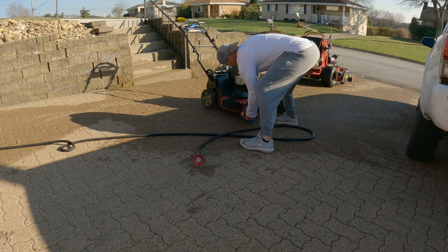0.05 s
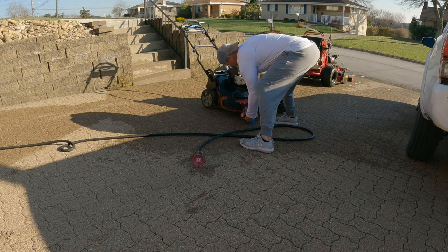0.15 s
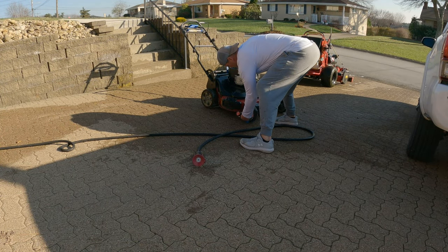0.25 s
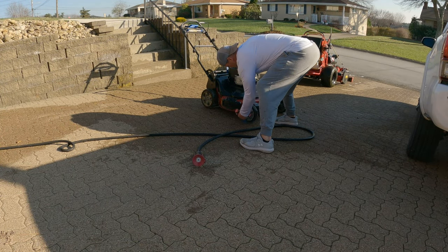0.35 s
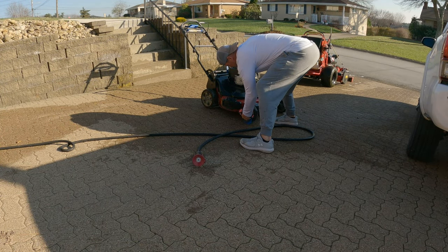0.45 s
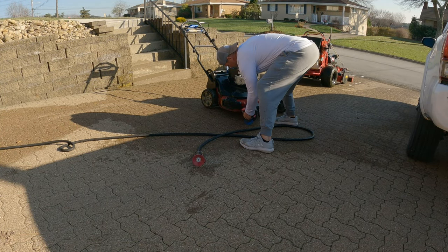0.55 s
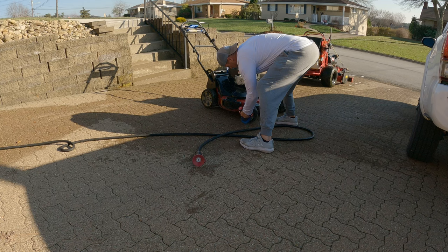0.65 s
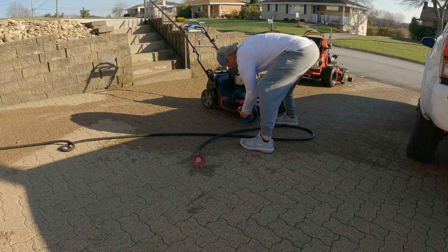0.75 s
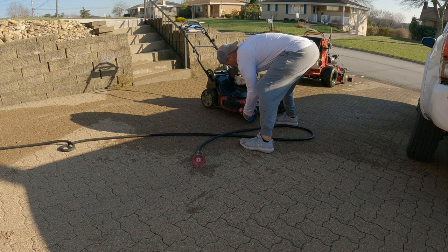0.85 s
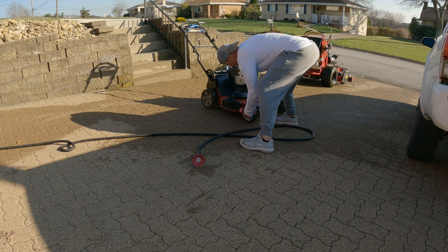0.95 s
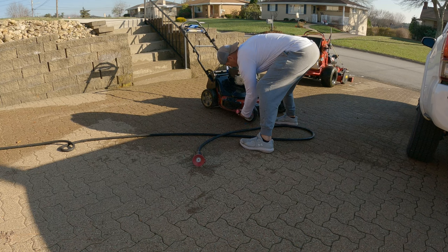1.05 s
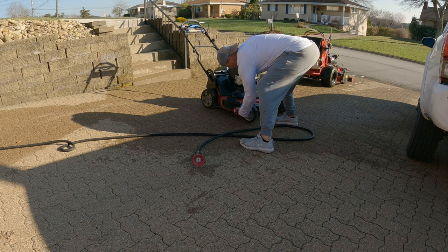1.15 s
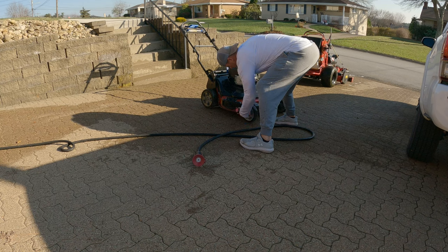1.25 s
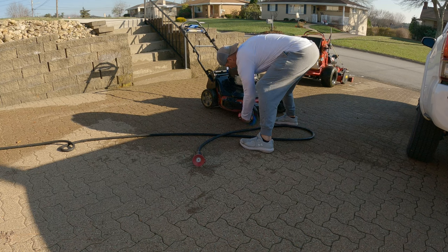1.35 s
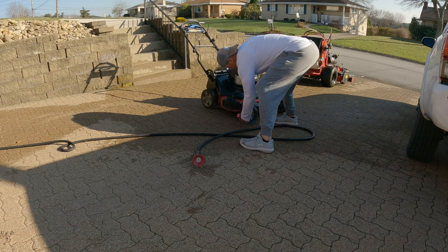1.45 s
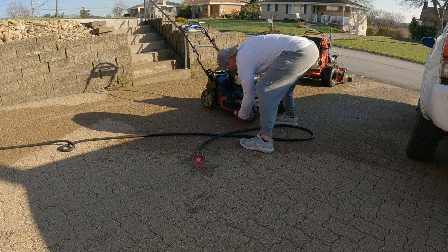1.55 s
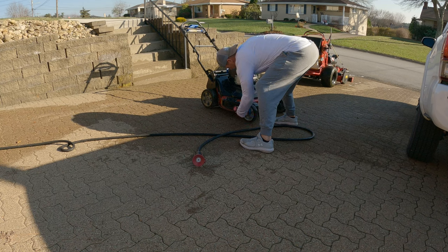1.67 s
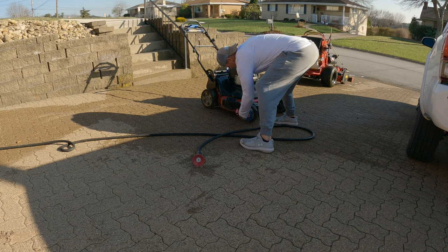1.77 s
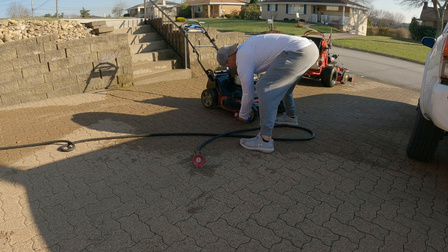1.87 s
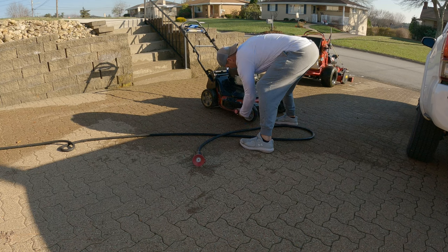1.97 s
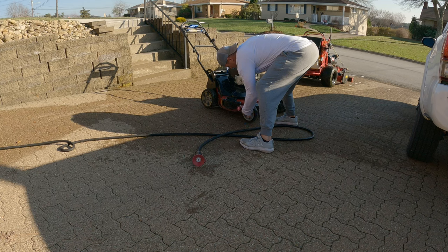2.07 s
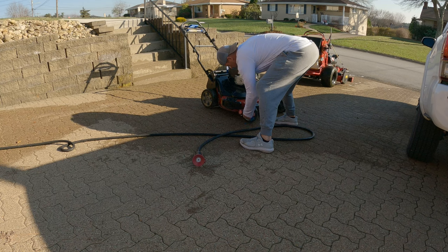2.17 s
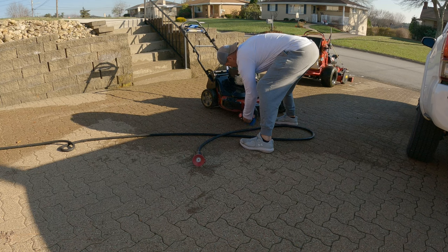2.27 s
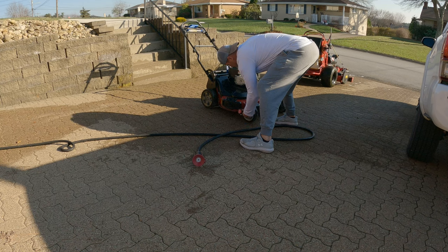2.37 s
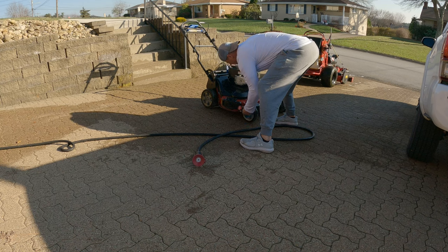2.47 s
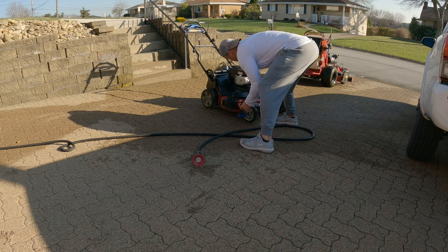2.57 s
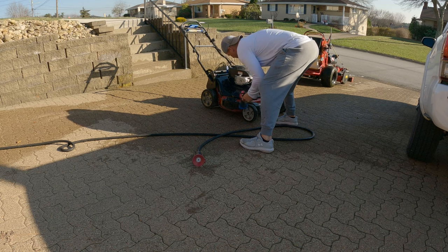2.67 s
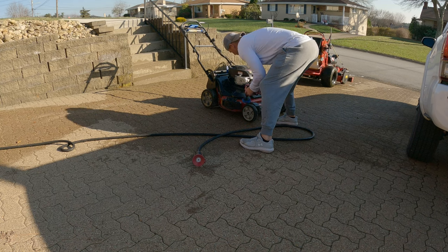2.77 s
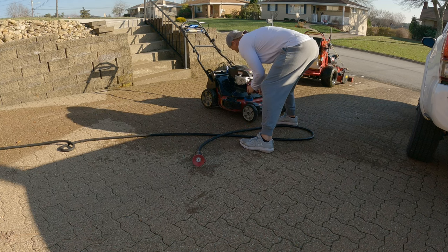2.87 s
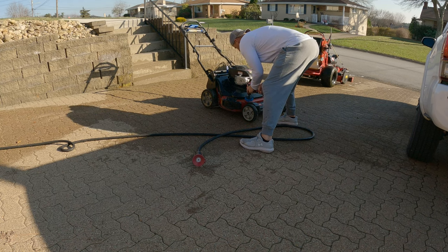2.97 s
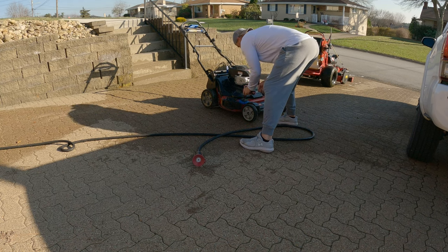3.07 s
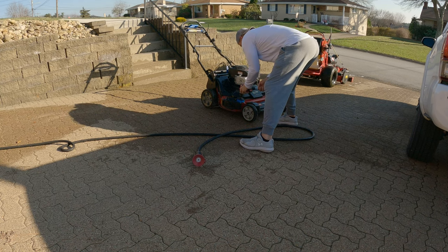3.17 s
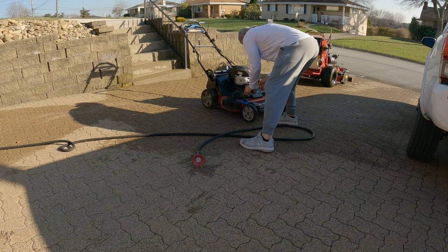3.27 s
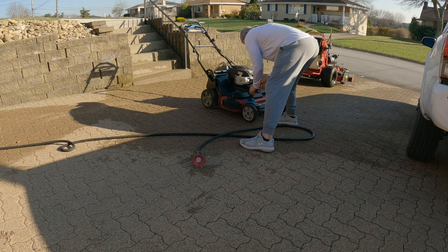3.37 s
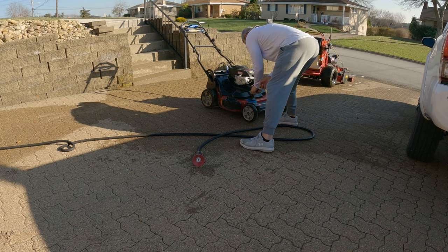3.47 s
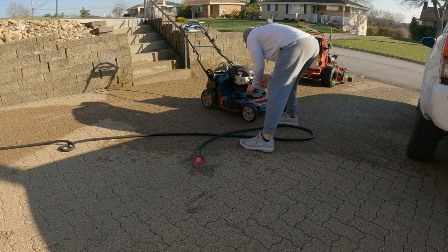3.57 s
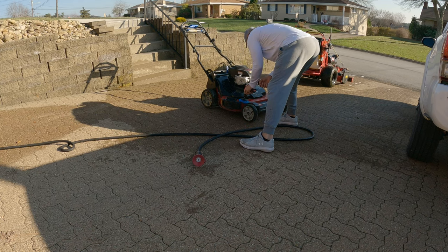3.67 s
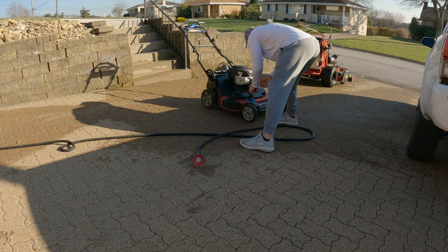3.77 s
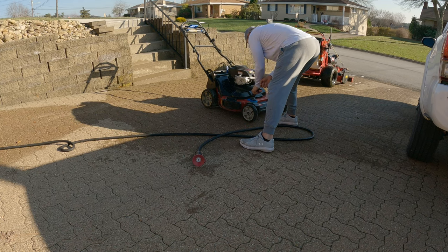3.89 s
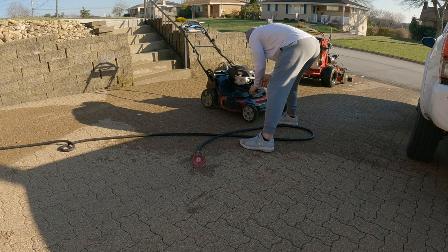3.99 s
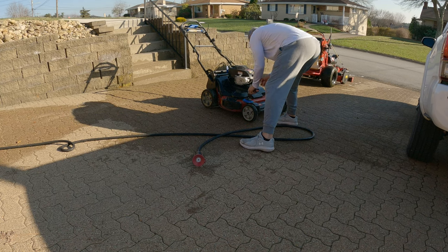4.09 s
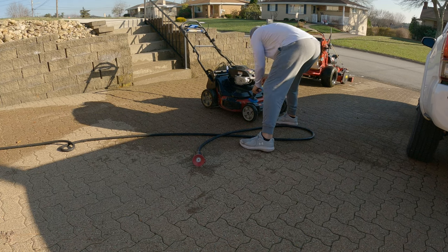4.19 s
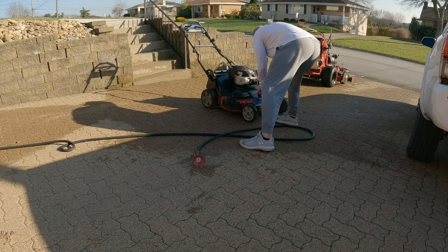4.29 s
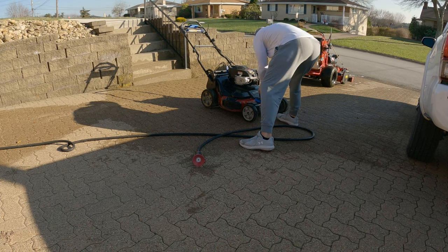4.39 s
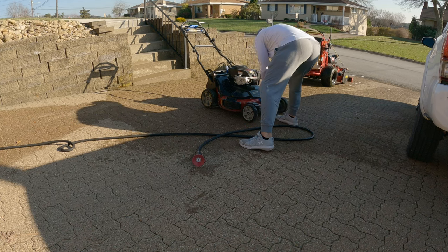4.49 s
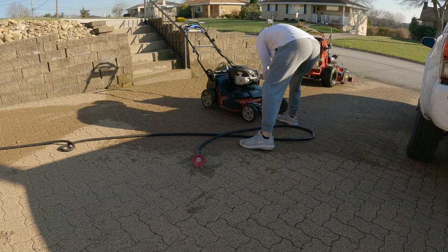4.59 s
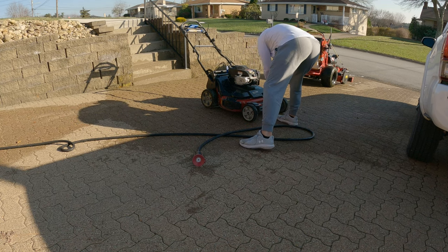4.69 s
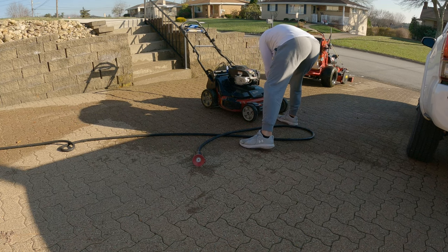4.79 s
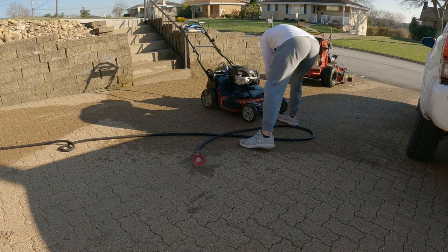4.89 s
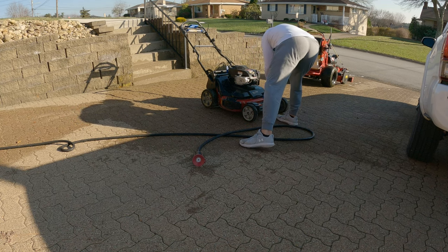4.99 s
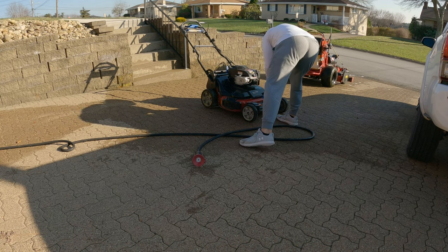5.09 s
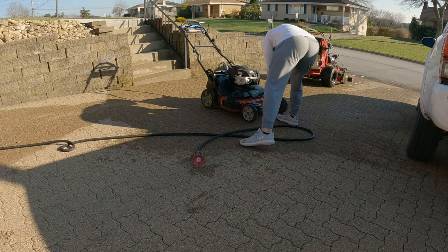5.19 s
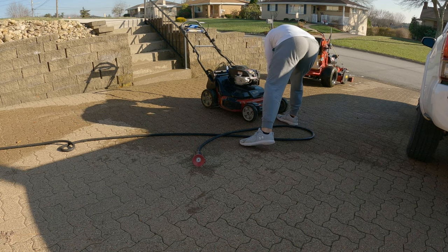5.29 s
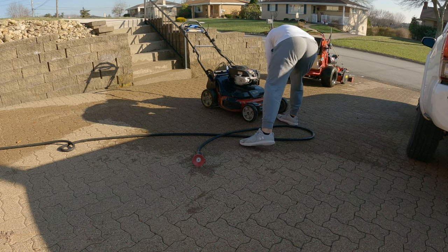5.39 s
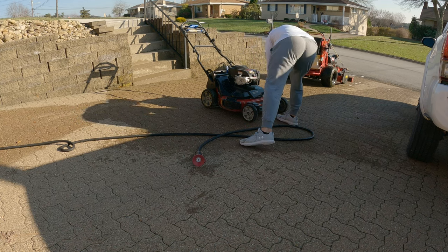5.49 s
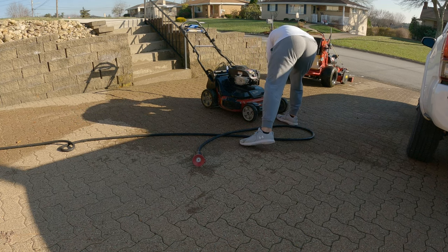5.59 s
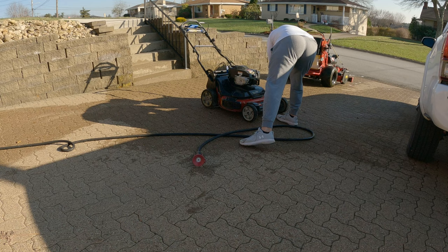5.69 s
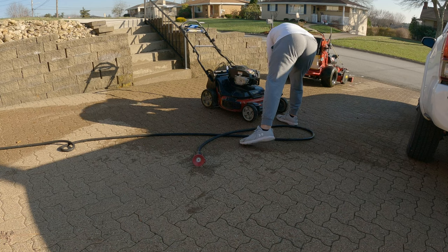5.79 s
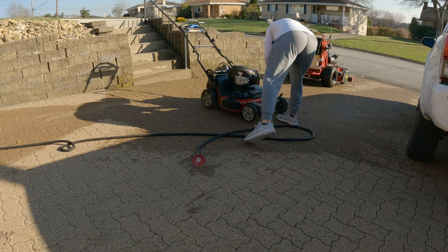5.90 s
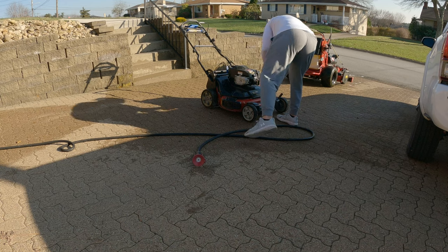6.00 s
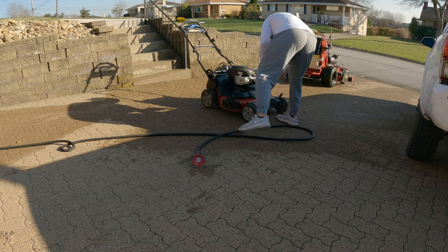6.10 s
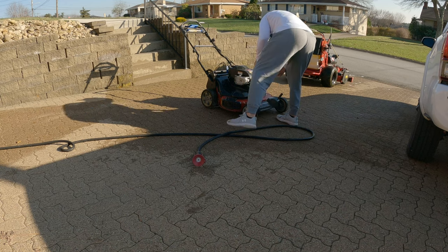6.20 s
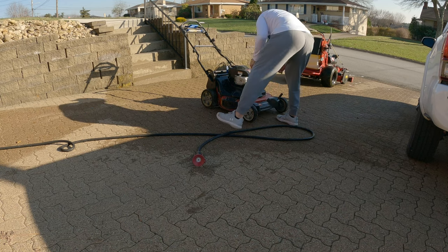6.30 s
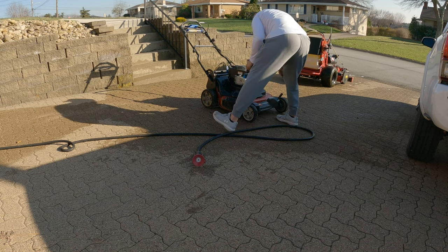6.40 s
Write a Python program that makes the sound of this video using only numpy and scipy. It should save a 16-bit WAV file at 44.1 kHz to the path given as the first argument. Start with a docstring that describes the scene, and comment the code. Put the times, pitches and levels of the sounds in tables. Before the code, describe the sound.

On a paved yard, a cordless drill spins a scrub brush on a mower: bright motor whine, gear rattle and bristle hiss, with a few light plastic taps. It drops to a stop, restarts quieter with changing pitch and dull steel knocks, then winds down. Low wind buffets the nearby microphone, and shoes scuff faintly at the end.

```python
"""A paved yard, where a cordless drill spins a scrub brush on a mower in two bursts.
Motor and gear teeth whine as sines at multiples of the shaft speed; rattle and bristle hiss are banded noise.
The brush hub taps the plastic wheel and the drill bumps the steel deck: clicks that ring their modes.
A deck panel hums as one wavering sine, walls answer through feedback delays,
shoes scuff in gritty bursts, and wind buffets the microphone over faint far air."""
import sys
import numpy as np
from scipy import signal
from scipy.fft import rfft, irfft
from scipy.io import wavfile
from scipy.ndimage import uniform_filter1d

SR = 44100
rng = np.random.default_rng(int(sys.argv[2]) if len(sys.argv) > 2 else 0)


def store_wav(level_fs):
    """Save 16-bit WAV to argv[1]."""
    pcm = np.round(np.clip(np.atleast_2d(level_fs), -1, 1) * 32767)
    wavfile.write(sys.argv[1], SR, pcm.T.astype(np.int16))


N = 284434


def amp(db):
    """dB to gain."""
    return 10 ** (np.asarray(db) / 20)


def rms_one(x):
    """Scale to rms 1."""
    return x / np.sqrt(np.mean(x ** 2) + 1e-20)


def in_time(rows):
    """Draw the columns after the time column as sample-by-sample curves."""
    s, *columns = np.transpose(rows)
    return [np.interp(np.arange(N) / SR, s, c) for c in columns]


def while_on(tables, rise_s=0.0097, fall_s=0.0081):
    """Gate that is open from the first to the last time of each table; one that starts at 0 is open at once."""
    t = np.arange(N) / SR
    gate = 0
    for rows in tables:
        start, end = rows[0][0], rows[-1][0]
        fade_in = (t - start) / rise_s + (start == 0)
        fade_out = (end - t) / fall_s
        gate = gate + np.clip(np.minimum(fade_in, fade_out), 0, 1)
    return gate


def at_hz(points, hz):
    """Read a spectrum on a log-frequency axis."""
    points = np.array(points)
    return np.interp(np.log(hz), np.log(points[:, 0]), points[:, 1])


def drift(rate):
    """Slow random wander of spread 1: noise through two equal low-pass poles at rate [Hz]."""
    step = 40   # samples between the points of the slow curve
    r = np.exp(-2 * np.pi * rate * step / SR)
    white = rng.standard_normal(N // step + 2002)
    slow = rms_one(signal.lfilter([1], [1, -2 * r, r * r], white)[2000:])   # drop the filter's start
    return np.interp(np.arange(N) / step, np.arange(len(slow)), slow)


def ring(clicks, hz, t60):
    """One mode as a two-pole resonator: a unit click starts a sine of height 1 that falls 60 dB in t60 [s]."""
    r, w = amp(-60 / (t60 * SR)), 2 * np.pi * hz / SR
    return signal.lfilter([0, np.sin(w)], [1, -2 * r * np.cos(w), r * r], clicks + 1e-18)


def banded_noise(spectrum, patchy_db, rate, likeness=None):
    """Third-octave bands of stereo noise, each with its own level, flicker and left-right likeness; rms 1."""
    # usual left-right likeness of noise: (frequency [Hz], correlation)
    usual_likeness = [(300, 0.9), (1000, 0.94), (4000, 0.98), (8000, 0.65), (13000, .6)]
    likeness = usual_likeness if likeness is None else likeness
    lowest, highest = spectrum[0][0], spectrum[-1][0]
    edges = lowest * 2 ** np.arange(0, np.log2(highest / lowest) + .2, 1 / 3)
    edges = edges[edges < .45 * SR]
    white = rng.standard_normal((2, 2, N))
    out = 0
    for k, (low, high) in enumerate(zip(edges, edges[1:])):
        band = signal.butter(2, [low, high], "band", fs=SR, output="sos")
        mid, side = signal.sosfilt(band, white[k % 2])   # neighbouring bands take different noise
        hz = np.sqrt(low * high)
        alike = np.clip(at_hz(likeness, hz), -1, 1)
        gain = amp(at_hz(spectrum, hz) + patchy_db * drift(rate))
        out = out + gain * (np.sqrt(1 + alike) * mid + np.sqrt(1 - alike) * side * [[1], [-1]])
    return rms_one(out)


def casing_gain(hz, resonance):
    """The casing lifts whatever falls on its resonance, a bell around the middle frequency."""
    mid_hz, wide_hz, db = resonance
    return 1 + (amp(db) - 1) / (1 + (2 * (hz - mid_hz) / wide_hz) ** 2)


def strong_whines(turns, hz, change_per_s, glide, swing_db):
    """The loudest shaft multiples, shaped by speed, tilt of the drill and the resonance of its housing."""
    # which multiples of the shaft speed whine strongest
    strong_multiples = (4, 8, 10, 13, 16)
    # one row for each: (level at full speed before swell and housing [dB], rise per octave of speed [dB],
    # share of the swell, share of the rattle's swing, flutter [dB],
    # gain speeding up and loss slowing down [dB], share of the housing's lift)
    strong_levels = [(-43, 15, 0.23, -0.5, 2.5, 5, 0.37), (-44.5, 5, 0.83, 0.92, 1.5, 3.5, 0.95),
                     (-50.5, -1.5, .3, 0.92, 2.5, 1, 0.98), (-39.5, 14.5, -0.33, 0.54, 3.5, 3, 0.24),
                     (-58.5, -32, 0.55, 1, 0.5, 0.5, .55)]
    # the whine swells and sinks as the drill is tilted: (time [s], level [dB])
    tilt_swell = [(0.0, -3.5), (0.07, 8.5), (0.1, 7), (0.16, 6.5), (0.24, -1), (0.28, 1), (0.32, 1),
                  (0.39, 8), (0.46, -4), (0.54, 11.5), (0.59, 6), (0.71, 9), (0.78, -2), (0.96, 7),
                  (1.04, -6), (1.07, 4.5), (1.2, 6.5), (1.33, -3.5), (1.43, 9), (1.7, 11), (1.8, -13.5),
                  (2.04, 13), (2.16, 0.5), (2.33, -2.5), (2.4, 11.5), (2.45, 7), (2.5, -3), (2.55, -4),
                  (2.6, 6.5), (2.65, -9), (3.07, -22.5), (3.1, -8.5), (3.29, -10), (3.41, 2.5), (3.46, 6),
                  (3.78, 1), (3.84, 13), (3.97, -27), (4.03, 6), (4.12, 0), (4.17, -0.5), (4.33, -4),
                  (4.36, 3.5), (4.44, 12), (4.47, -1), (4.52, 13), (4.78, 8), (4.88, 0.5), (4.91, -2.5),
                  (5.07, 10.5), (5.1, -9), (5.2, 11), (5.31, -10), (5.4, -6), (5.63, 4.5), (5.68, 6),
                  (5.73, -10), (5.8, -22)]
    # sharp resonance of the housing: (frequency [Hz], width [Hz], lift [dB])
    housing = (3360, 580, 18.94)
    full_speed_hz = 450
    full_drive_per_s = 1.4   # share of speed change per s at which the drive gain is full
    swell_db = in_time(tilt_swell)[0]
    octaves = np.log2(hz / full_speed_hz)
    drive = np.clip(change_per_s / full_drive_per_s, -1, 1)
    whine = 0
    for k, row in zip(strong_multiples, strong_levels):
        db, octave_db, share, follows, flutter_db, drive_db, lift = row
        level_db = db + octave_db * octaves + share * swell_db + follows * swing_db + drive_db * drive
        flicker_db = flutter_db * drift(6) + (2 + .8 * glide) * drift(36)
        loud = amp(level_db + flicker_db) * casing_gain(k * hz, housing) ** lift
        whine += np.sqrt(2) * loud * np.sin(2 * np.pi * (k * turns + rng.random()))
    return whine


def weak_whines(turns, hz, glide, swing_db):
    """Fainter shaft multiples from the gears: follow the rattle, blur in glides, stand out at low speed."""
    # the odd fractions are the planet gears and their side tones:
    # (shaft multiple, level before the gears' rise and fall and the casing [dB], flutter [dB])
    gear_tones = [(1, -56, 4), (2, -50, 3), (3, -55, 4), (5, -53, 4), (6, -58, 3), (6.41, -62, 3),
                  (7, -49.5, 2.5), (7.41, -50, 2.5), (8.41, -49, 2.5), (9, -49, 2.5), (9.41, -57, 3),
                  (12, -57, 3), (14, -62, 3), (15, -60, 4), (20, -61, 3), (26, -63, 4), (44, -63, 3)]
    # resonance of the drill casing: (frequency [Hz], width [Hz], lift [dB])
    casing = (3900, 1500, 10)
    gears_db = swing_db - 0.5 - 3.1 * glide + 9 * np.clip(400 / hz - 1, 0, 1)
    whine = 0
    for k, db, flutter_db in gear_tones:
        loud = np.sqrt(2) * amp(gears_db + db + flutter_db * drift(7.1)) * casing_gain(k * hz, casing)
        whine += loud * np.sin(2 * np.pi * (k * turns + rng.random()))
    return whine


def brush_noise(turns, rattle_db, rumble_db, loud_rattle_db):
    """Bristle hiss and gear rattle that throb with the shaft, over a steadier scrub rumble."""
    # noise colours, relative levels: (frequency [Hz], level per Hz [dB])
    hiss_colour = [(3000, -26.5), (5000, 3), (7500, 2.5), (8500, -5.5), (10500, -9), (12500, -18),
                   (13600, -22.5), (15000, -50)]
    rattle_colour = [(1500, -33), (2000, -6), (2700, -0.5), (3400, 3.5), (4000, 7.5), (5000, -3),
                     (6000, -2.5), (7500, -23.5), (9000, -37)]
    rumble_colour = [(150, -28.5), (250, -13), (424, -11), (477, -12.5), (622, -8.5), (966, -7), (1530, -3),
                     (1940, -3.5), (2600, -9.5), (3380, -36.5), (5720, -120)]
    # one throb a turn, and one at 0.41 of the shaft speed
    throb = 1 + .14 * np.sin(2 * np.pi * turns) + .14 * np.sin(2 * np.pi * .41 * turns)
    # the hiss lies 6 dB under a loud rattle and swings a little wider
    hiss_db = loud_rattle_db - 6 + 1.01 * (rattle_db - loud_rattle_db)
    noise = amp(hiss_db) * throb * banded_noise(hiss_colour, patchy_db=1.8, rate=7.2)
    noise += amp(rattle_db) * throb * banded_noise(rattle_colour, patchy_db=2.64, rate=11.0)
    noise += amp(rumble_db) * banded_noise(rumble_colour, patchy_db=2.5, rate=9.3)
    return noise


def drill():
    """Motor and gears lock their sines to one shaft angle; the brush noise throbs on the same angle."""
    # motor shaft, one table per trigger pull: (time [s], speed [Hz])
    shaft_speed = [
        [(0.0, 449.5), (0.6, 449.5), (0.7, 444.5), (0.88, 445.5), (0.95, 455), (1.21, 451), (1.265, 483),
         (2.52, 483), (2.59, 402), (2.66, 190)],
        [(3.075, 200), (3.105, 222), (3.23, 218), (3.3, 230), (3.33, 352), (3.42, 387), (3.45, 420),
         (3.49, 430.5), (3.93, 430), (3.96, 394), (4.01, 330), (4.06, 298), (4.11, 303), (4.15, 360),
         (4.24, 413.5), (4.33, 418.5), (4.38, 448.5), (4.87, 449), (4.98, 338), (5.13, 340.5), (5.3, 344),
         (5.62, 344.5), (5.66, 293), (5.72, 240), (5.8, 195)],
    ]
    # gear rattle and bristles, one table per trigger pull: (time [s], rattle [dB], scrub rumble [dB])
    brush_levels = [
        [(0.0, -31, -39), (1.0, -32.5, -39), (1.25, -30.5, -38), (2.54, -30.5, -38.5), (2.6, -32.5, -42.5),
         (2.64, -40, -36), (2.68, -56, -66)],
        [(3.03, -48, -53), (3.07, -39.5, -45), (3.11, -45, -50), (3.2, -41, -46), (3.35, -36.5, -41.5),
         (3.92, -35.5, -35.5), (4.06, -39, -41), (4.16, -37, -42.5), (4.46, -37.5, -34), (4.65, -39.5, -38.5),
         (4.94, -36.5, -37), (5.1, -42, -40.5), (5.63, -40.5, -43), (5.78, -52, -48.5), (5.81, -58.5, -54),
         (5.88, -75, -77)],
    ]
    loud_rattle_db = -32   # the rattle's swing is counted from here
    hz = in_time(sum(shaft_speed, []))[0]
    rattle_db, rumble_db = in_time(sum(brush_levels, []))
    swing_db = rattle_db - loud_rattle_db
    slope = np.gradient(np.log(hz)) * SR   # share of speed change per s
    change_per_s = uniform_filter1d(slope, size=1000)
    glide = np.minimum(uniform_filter1d(np.abs(slope), size=1000), 4)
    # the speed trembles, most while it changes
    tremble = (.001 + .0012 * glide) * drift(40) + .002 * drift(3)
    turns = np.cumsum(hz * (1 + tremble)) / SR
    whine = strong_whines(turns, hz, change_per_s, glide, swing_db)
    whine = whine + weak_whines(turns, hz, glide, swing_db)
    noise = brush_noise(turns, rattle_db, rumble_db, loud_rattle_db)
    return whine * while_on(shaft_speed, rise_s=0.023, fall_s=0.025) + noise * while_on(brush_levels)


def walls(x):
    """Echoes between walls: six feedback delays a side, quieter and duller on every round."""
    t60_s, cut_hz = 0.71, 4300   # decay before dulling, low-pass of each round
    dull = np.exp(-2 * np.pi * cut_hz / SR)
    lags = (rng.uniform(0.022, .07, 12) * SR).astype(int)
    out = np.zeros((2, N))
    for k, lag in enumerate(lags):
        loop, gain, state = x.copy(), amp(-60 * lag / SR / t60_s), [0.]
        for i in range(lag, N, lag):
            back, state = signal.lfilter([gain * (1 - dull)], [1, -dull], loop[i - lag:i], zi=state)
            loop[i:i + lag] += back[:N - i]
        out[k % 2] += (loop - x) * (-1) ** (k // 2)   # echoes only, signs mixed
    return out


def wind():
    """Buffeting at the microphone: lumpy low noise with a few single pressure swings."""
    # strength of the buffeting before its lumps: (time [s], level [dB])
    wind_level = [(0.0, -44.5), (0.81, -44.5), (1.1, -47), (1.33, -42), (1.7, -48.5), (3.2, -43),
                  (3.74, -47), (4.58, -45), (5.0, -44), (5.77, -40), (6.02, -44), (6.45, -41.5)]
    # single buffets: (time [s], peak [dB], pitch [Hz])
    gusts = [(5.612, -28.5, 70), (5.632, -19, 70.4), (5.684, -31.5, 70), (5.747, -21.5, 65.4),
             (5.851, -30.5, 69)]
    # relative colour: (frequency [Hz], level per Hz [dB])
    wind_colour = [(12, -29.5), (20, 0.5), (43, -7.5), (158, -9.5), (229, -19.5), (282, -22.5),
                   (318, -23.5), (468, -38.5), (700, -64), (910, -89), (1540, -120)]
    # buffeting differs between the microphone ports: (frequency [Hz], left-right likeness)
    wind_likeness = [(25, 0.72), (70, 0.97), (150, 0.98), (500, 0.79)]
    t = np.arange(N) / SR
    swings = 0
    for s, db, hz in gusts:
        bell = np.exp(-((t - s) * hz * 2.05) ** 2)
        swings = swings - amp(db) * np.cos(2 * np.pi * hz * (t - s)) * bell
    lumps = amp(in_time(wind_level)[0] + 0.87 * drift(5))
    noise = banded_noise(wind_colour, patchy_db=1.0, rate=6.7, likeness=wind_likeness)
    return lumps * noise + swings


def far_air():
    """Faint steady air of the yard as coloured noise."""
    # relative colour: (frequency [Hz], level per Hz [dB])
    air_colour = [(290, -19), (500, -6.5), (846, -31), (972, -20.5), (1230, -8.5), (2620, -23.5),
                  (4370, -28.5), (6700, -23.5), (10000, -52.5), (13000, -70), (22000, -120)]
    return amp(-70) * banded_noise(air_colour, patchy_db=1.0, rate=5.3)


def blows(events, modes):
    """A blow and its chatter ring the modes near the struck spot's pitch most; a short crack leads."""
    out, t = np.zeros(N), np.arange(SR // 5) / SR
    snap = signal.butter(2, [500, 3200], "band", fs=SR, output="sos")
    for s, db, spot_hz, crack_db, chatter_s in events:
        at, grit = round(s * SR), rng.standard_normal((2, len(t)))
        push = .04 * grit[0] * np.exp(-t / chatter_s * 3)
        push[0] = 1   # the blow itself
        sound = amp(crack_db) * signal.sosfilt(snap, grit[1] * np.exp(-t / .002))
        for k, (hz, mode_db, t60) in enumerate(modes):
            late = round(SR * .025 / np.sqrt(hz))   # slow bending waves bring the lows last
            off_db = 7 * abs(np.log2(hz / spot_hz))
            mode = ring(push, hz, t60)[:len(t) - late]
            sound[late:] += (-1) ** k * mode * amp(db + mode_db - off_db - 6)
        out[at:at + len(t)] += sound
    return signal.sosfilt(signal.butter(3, [60, 5500], "band", fs=SR, output="sos"), out)


def wheel_taps():
    """The brush hub taps the plastic wheel, whose few modes ring briefly."""
    # (time [s], relative strength [dB])
    hub_taps = [(0.669, -26), (0.713, -16.5), (0.773, -21), (0.815, -24), (0.823, -22.5), (0.84, -18.5),
                (0.856, -20.5)]
    # modes of the wheel: (frequency [Hz], relative level [dB], t60 [s])
    wheel_modes = [(400, 0.5, 0.063), (707, 1, 0.024), (1018, 5.5, 0.045), (1295, -16, .03), (1637, 5, .03)]
    # blow 4 dB down, spot pitch 1000 Hz, crack 12 dB down, chatter 0.01 s
    return blows([(s, db - 4.0, 1000, db - 12, .01) for s, db in hub_taps], wheel_modes)


def deck_knocks():
    """The drill bumps the steel deck and rings its modes."""
    # (time [s], relative strength [dB], pitch of the struck spot [Hz], crack [dB], chatter length [s])
    knocks = [(3.232, -15.5, 400, -14, 0.087), (3.243, -11.5, 300, -41, 0.095),
              (3.252, -16.5, 190, -9, 0.058), (3.82, -15, 390, -19, 0.11), (3.928, -13.5, 390, -27, 0.082),
              (3.941, -19, 250, -44, 0.13), (3.966, -36, 300, -36, 0.02), (4.385, -28.5, 800, -27, 0.024),
              (4.49, -8, 230, -30, 0.061), (4.505, -16, 220, -31.5, 0.051),
              (4.947, -13.5, 210, -33.5, 0.087), (5.0675, -5.5, 232, -5.5, 0.11),
              (5.093, -16, 195, -33.5, 0.12), (5.3, -29, 300, -40, 0.1), (5.463, -24, 250, -28, 0.25)]
    # modes of the deck: (frequency [Hz], relative level [dB], t60 [s])
    deck_modes = [(99.2, -6, 0.13), (143.4, -4, 0.15), (186.4, 6.5, 0.042), (229, 5.5, 0.052),
                  (300, -6.5, 0.13), (390, 6.5, 0.027), (553, -9, 0.079), (640, 6, 0.022),
                  (790, 0.5, 0.042), (1070, 4, 0.04), (1330, 4.5, 0.045), (1703, 9, 0.011),
                  (2200, -22.5, .02)]
    return blows(knocks, deck_modes)


def panel():
    """A deck panel hums under the brush: one sine of wavering pitch and level."""
    # (time [s], pitch [Hz], level [dB])
    hum = [(4.52, 396, -50), (4.58, 393.5, -27.5), (4.69, 412, -57), (4.75, 428, -33.5), (4.81, 393, -45.5)]
    hz, db = in_time(hum)
    return np.sqrt(2) * amp(db) * np.sin(2 * np.pi * np.cumsum(hz) / SR) * while_on([hum])


def shoes():
    """Shoes scuff the paving: gritty noise bursts that start at once and die away."""
    # (time [s], level at the start [dB], decay time constant [s])
    scuffs = [(5.932, -63, 0.019), (5.954, -57, 0.029), (5.974, -61, 0.018), (6.161, -76.5, .005),
              (6.228, -59.5, 0.0049), (6.414, -65, 0.011)]
    # relative colour of the sole: (frequency [Hz], level per Hz [dB])
    sole_colour = [(700, -3), (1500, 5), (3000, 0), (6000, -12), (10000, -30)]
    t = np.arange(N) / SR
    shape = sum(amp(db) * (t > s) * np.exp(-np.abs(t - s) / length) for s, db, length in scuffs)
    grit = amp(1.8 * drift(150))
    return shape * grit * banded_noise(sole_colour, patchy_db=1.0, rate=22)


def at_ports(work):
    """Two microphone ports: the left one's phase shifts with frequency, and the work is panned."""
    # the drill moves about: (time [s], left minus right [dB])
    pan = [(0.0, -0.5), (2.27, -0.5), (3.45, -1), (5.26, -0.9), (5.52, -1.5), (5.9, 0)]
    # phase by which the left is ahead, negative when it lags: (frequency [Hz], phase [radians])
    left_lead = [(100, 0.4), (1000, -0.4), (3200, -0.74), (6500, -0.46), (9000, -.4), (11000, -0.2)]
    padded = N + 15566   # silence after the end, for the transform
    hz = np.fft.rfftfreq(padded, 1 / SR) + 1   # +1 keeps the logarithm finite
    left = irfft(rfft(work[0], padded) * np.exp(1j * at_hz(left_lead, hz)))[:N]
    pan_db = in_time(pan)[0]
    return np.array([left * amp(pan_db / 2), work[1] * amp(-pan_db / 2)])


def scene():
    """The work and its echoes, with wind, far air and shoes around it."""
    work = drill() + wheel_taps() + deck_knocks() + panel()
    echoes = amp(-24) * walls(work.mean(0))
    return at_ports(work) + echoes + wind() + far_air() + shoes()


def record(dry):
    """A steep low-pass cuts the top."""
    cutoff_hz = 14400
    # the filter counts from the edge of its stop band, a little above the cutoff
    return signal.sosfilt(signal.cheby2(12, 60, cutoff_hz * 1.04, fs=SR, output="sos"), dry)


dry = scene()
out = record(dry)
store_wav(out)
```